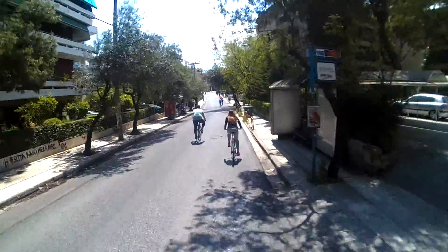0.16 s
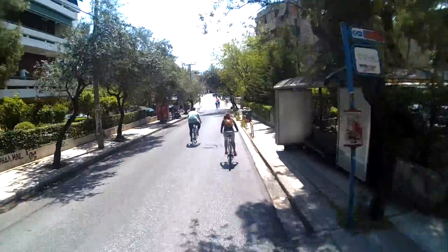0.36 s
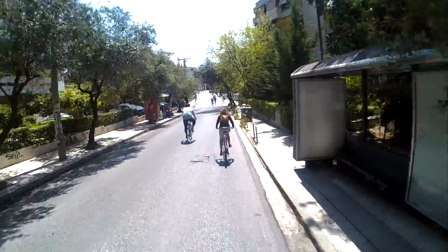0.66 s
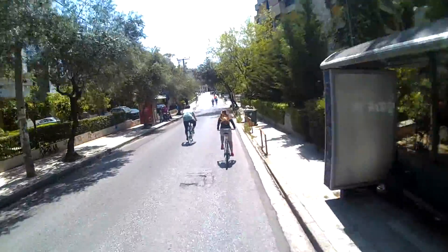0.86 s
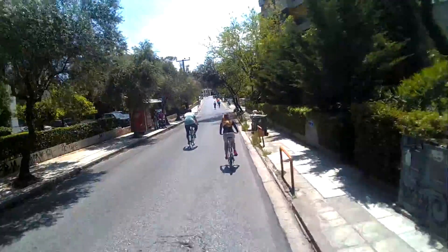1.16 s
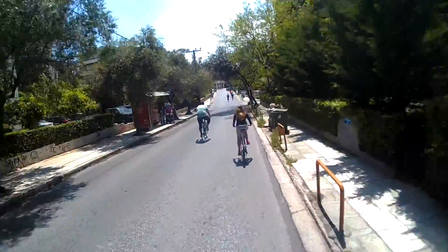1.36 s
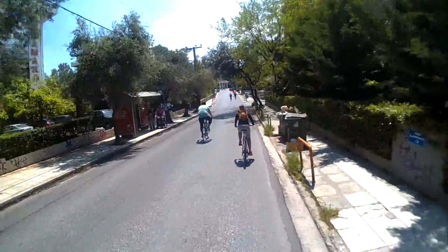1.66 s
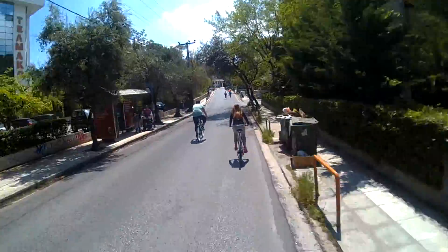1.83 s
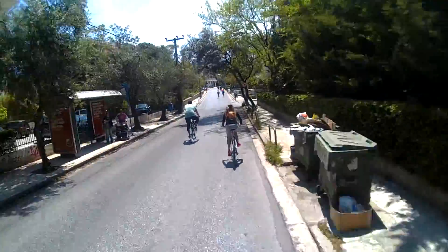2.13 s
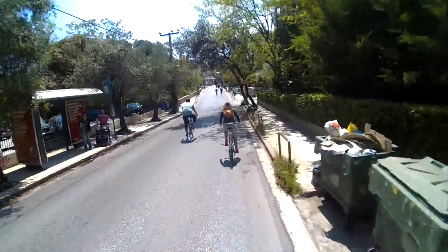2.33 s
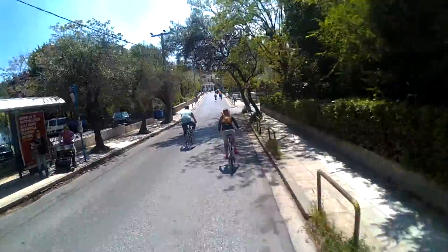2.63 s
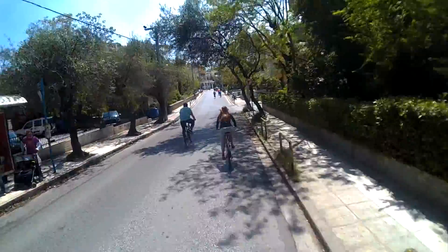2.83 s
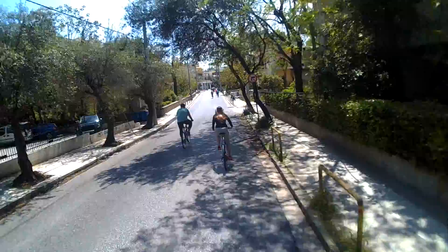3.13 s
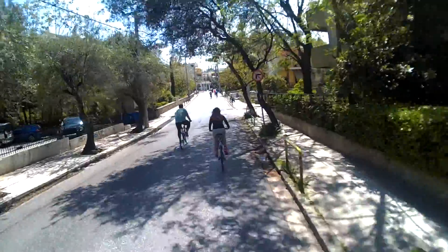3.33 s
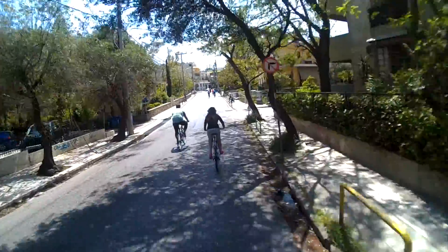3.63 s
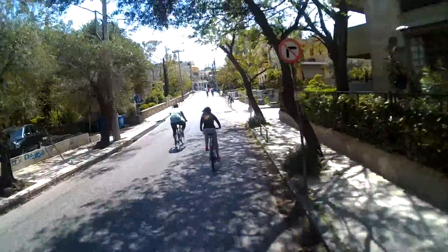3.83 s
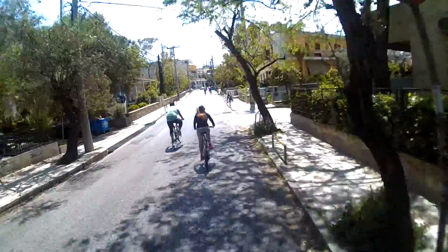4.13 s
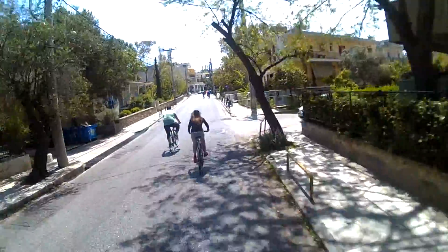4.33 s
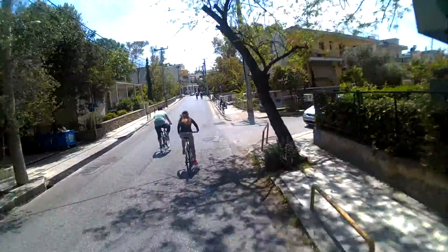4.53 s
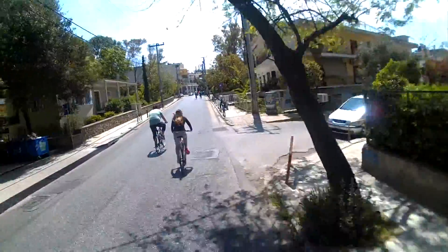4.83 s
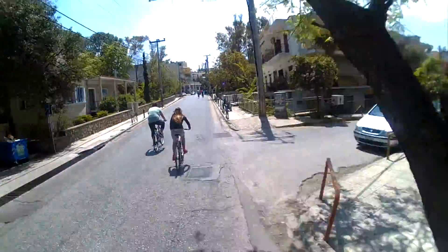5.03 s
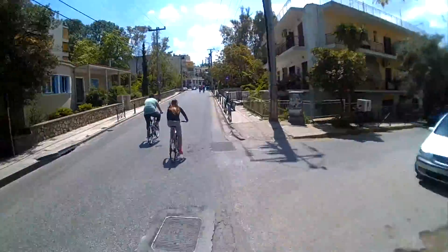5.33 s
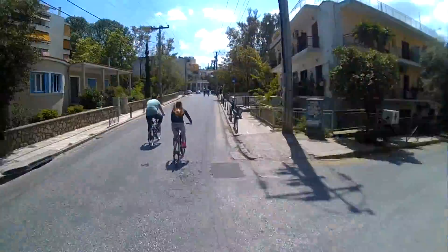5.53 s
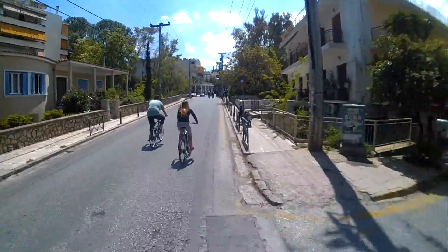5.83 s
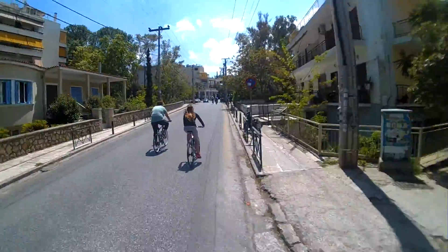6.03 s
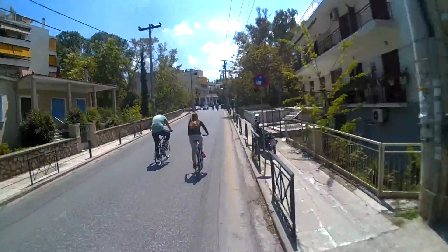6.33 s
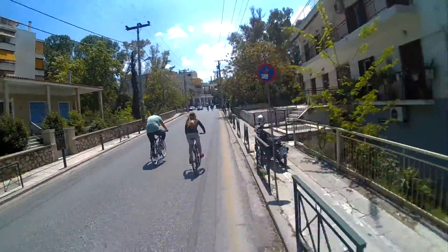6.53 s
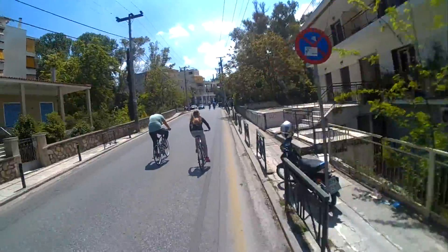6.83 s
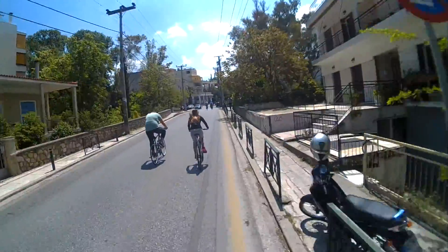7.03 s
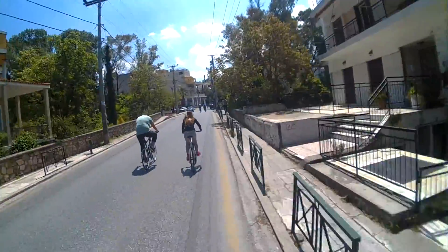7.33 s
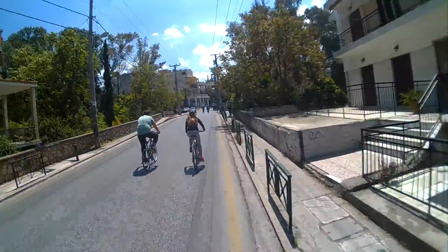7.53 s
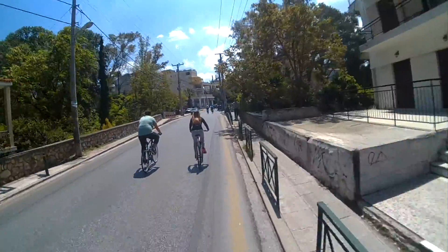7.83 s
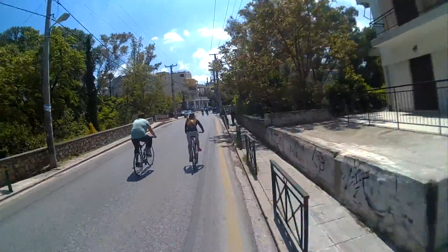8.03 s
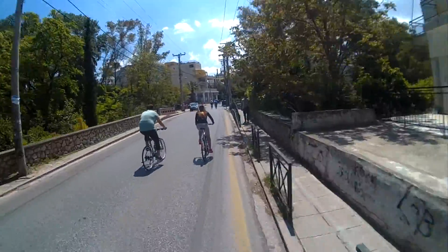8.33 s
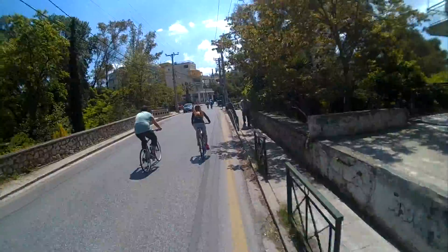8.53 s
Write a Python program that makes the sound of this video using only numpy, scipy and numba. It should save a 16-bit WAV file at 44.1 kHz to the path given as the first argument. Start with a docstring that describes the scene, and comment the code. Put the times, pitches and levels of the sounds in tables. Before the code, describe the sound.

Heard from a moving bicycle, a hollow, fluttering rush of wind covers nearly everything, muffled by the case around the microphone. Gusts bump against it, briefly whistle and now and then drop out for an instant. Faint tyre noise on the asphalt and light chain ticking lie underneath. Scattered small knocks build into a run of rattles on a rough stretch of street, and the wind grows softer toward the end.

```python
"""An asphalt street, heard from a small cased camera riding on a bicycle. The turbulent airstream
buffets the case, rings its cavity near 1.35 kHz and hisses over its edges; single gusts thump or whistle
briefly, and now and then the flow lifts off in a short lull. Beneath the wind the tyres sizzle and the
chain ticks, and on rough patches a loose part chatters. The case shuts out nearly all the treble."""
import sys
import numpy as np
from scipy import signal
from scipy.fft import rfft, irfft, next_fast_len
from scipy.io import wavfile
from scipy.ndimage import uniform_filter1d
from numba import njit

SR = 44100
rng = np.random.default_rng(int(sys.argv[2]) if len(sys.argv) > 2 else 0)


def to_wav(sig):
    """Store sig (one row per channel, or 1-D mono) as 16-bit WAV at the path in sys.argv[1].

    Samples outside -1..1 are clipped; the rate is SR.
    """
    pcm = np.clip(np.atleast_2d(sig), -1, 1) * 32767
    pcm = np.round(pcm).astype(np.int16)
    wavfile.write(sys.argv[1], SR, pcm.T)  # frames by channels


N = 382347
T = np.arange(N) / SR

# dull clack of one contact, in the chain or the loose part: (frequency [Hz], level [dB])
CLACK_SPECTRUM = [(300, -25.5), (1300, -10.5), (2300, -11.5), (2750, -1), (3200, 3.5), (3700, -9),
                  (4500, -15), (4800, -27.5), (5300, -29.5), (5950, -54), (6500, -39), (7400, -45),
                  (8000, -60)]

def undb(db):
    """Decibels to amplitude ratio."""
    return 10 ** (np.asarray(db) / 20)

def unit(x):
    """Normalisation to rms 1."""
    return x / np.sqrt(np.mean(x ** 2))

def curve(table):
    """Linear interpolation of (time [s], value) rows."""
    return np.interp(T, *np.transpose(table))

def log_gain(spectrum, size):
    """Log gain of (frequency [Hz], level [dB]) rows on FFT bins, rolling off above the last row."""
    hz, db = np.transpose(spectrum)
    bins = np.maximum(np.arange(size // 2 + 1) * SR / size, 1)
    rolloff = 10 * np.log(np.maximum(bins / hz[-1], 1))
    return np.log(undb(np.interp(np.log(bins), np.log(hz), db))) - rolloff

def noise(spectrum):
    """White noise filtered to a (frequency [Hz], level [dB]) spectrum, rms 1."""
    size = next_fast_len(N, True)
    white = rfft(rng.standard_normal(size))
    return unit(irfft(white * np.exp(log_gain(spectrum, size)), size)[:N])

def impulse(spectrum, size=512):
    """Minimum-phase impulse response of a spectrum, peak 1."""
    cepstrum = irfft(log_gain(spectrum, size))
    cepstrum[1:size // 2] *= 2
    cepstrum[size // 2 + 1:] = 0
    click = irfft(np.exp(rfft(cepstrum)))
    return click / np.abs(click).max()

@njit
def bandpass(x, hz, width_hz):
    """Second-order resonator whose centre frequency may move."""
    y, band_state, low_state = np.empty(len(x)), 0., 0.
    for i in range(len(x)):
        g, damping = np.tan(np.pi * hz[i] / SR), width_hz / hz[i]
        band = (band_state + g * (x[i] - low_state)) / (1 + g * (g + damping))
        band_state, low_state = 2 * band - band_state, low_state + 2 * g * band
        y[i] = damping * band
    return y

def wander(per_s):
    """Smooth random fluctuation of rms 1, with about per_s new values a second."""
    hold = max(int(SR / per_s), 1)
    steps = np.repeat(rng.standard_normal(N // hold + 2), hold)[rng.integers(hold):][:N]
    return unit(uniform_filter1d(steps, hold))

def flutter(per_s, depth_db):
    """Random amplitude modulation, as by passing eddies; mean power 1."""
    return unit(undb(depth_db * wander(per_s)))

def swell(at, length):
    """Gaussian envelope, length seconds wide at half power."""
    return 2 ** (-2 * ((T - at) / length) ** 2)

def tyres():
    """Rolling noise: the tread sizzles faintly on the asphalt, most on the coarse stretch."""
    # tread sizzle: (frequency [Hz], level [dB])
    spectrum = [(2500, -8.5), (4000, 2.5), (4700, 3), (5400, -15), (5950, -39), (6500, -19.5), (7200, -19),
                (8000, -44), (9000, -32.5), (10400, -26.5), (12500, -32.5), (15000, -40)]
    # its strength along the road: (time [s], level [dB])
    road_level = [(.55, -75), (.75, -61), (2, -62), (3.5, -53.5), (4.8, -52), (5.2, -62.5), (7.1, -73),
                  (8.67, -73)]
    return noise(spectrum) * undb(curve(road_level)) * flutter(per_s=40, depth_db=-0.1)

def chain(ticks_per_s=160, spread_db=3, contact_s=0.001):
    """Impact noise: links strike the sprockets at random times, each with its own force."""
    # chain noise, loudest under pedalling: (time [s], level [dB])
    chain_level = [(.55, -67), (.68, -28), (.95, -45.5), (1.6, -35.5), (1.95, -43), (2.6, -40.5),
                   (4.9, -38), (5.9, -50), (6.6, -57)]
    ticks = (rng.random(N) < ticks_per_s / SR) * undb(spread_db * rng.standard_normal(N))
    force = signal.lfilter([1], [1, -np.exp(-1 / (contact_s * SR))], ticks)
    grit = force * rng.standard_normal(N)
    return unit(signal.fftconvolve(grit, impulse(CLACK_SPECTRUM))[:N]) * undb(curve(chain_level))

def rattles(bounce_s=0.0031, fade_db=6.0, scrape_s=0.001, ring_db=-9.5, uneven_db=3.3):
    """Impact excitation: a loose part rebounds unevenly; its contacts clack, tick and ring its modes."""
    # knocks: (time [s], relative level [dB], chatter length [s], tick level re the knock [dB])
    knocks = [(.131, -34, 0.0039, -44), (0.149, -32, .0034, -35), (.678, -36, 0.005, -28),
              (.723, -35, 0.029, -43), (.861, -34, .015, -48), (1.134, -28, 0.0034, -37.5),
              (1.303, -30.5, .014, -42), (1.397, -32, .006, -41), (1.46, -24.5, 0.008, -33),
              (1.482, -24.5, .0087, -37), (2.387, -26.5, 0.0034, -35), (2.445, -28.5, .006, -40),
              (3.873, -26.5, 0.0048, -35), (5.13, -25.5, .005, -35), (5.238, -27, 0.0077, -43),
              (5.417, -25, 0.01, -33), (5.459, -20.5, 0.012, -32.5), (5.494, -27.5, 0.0075, -43),
              (5.55, -28.5, 0.012, -38), (5.588, -29, 0.012, -42), (5.634, -23.5, 0.0041, -43),
              (5.719, -27.5, .017, -33), (5.775, -19.5, 0.011, -30), (5.854, -27, 0.018, -35),
              (5.896, -24.5, 0.009, -38), (5.939, -28.5, 0.0074, -37), (6.094, -27.5, .013, -27),
              (6.115, -20, 0.014, -31), (6.179, -28.5, 0.0045, -28), (6.193, -28, .01, -38),
              (6.272, -21.5, 0.014, -38), (6.377, -28.5, .0043, -37), (7.151, -27.5, .0026, -33),
              (7.167, -30.5, 0.028, -37), (7.221, -23, 0.016, -39), (7.285, -38.5, .005, -29),
              (7.657, -31, .009, -39), (7.681, -27, 0.017, -35), (7.764, -34.5, .012, -39),
              (8.122, -36, 0.0024, -34), (8.197, -42, .003, -30.5), (8.392, -33, .004, -45)]
    # modes of the part: (frequency [Hz], level [dB], time to decay 60 dB [s])
    part_modes = [(1900, -8, 0.055), (2870, 3.5, 0.056), (2940, 4.5, 0.06), (3330, 0, 0.024),
                  (3640, 0, 0.051), (3970, -3.5, 0.035), (4400, -4, 0.035)]
    # bright tick of one contact: (frequency [Hz], level [dB])
    tick_spectrum = [(7000, -42), (8300, -6), (9500, 4.5), (11500, 4.5), (14000, -3.5), (15500, -19.5)]
    out, t = np.zeros(N + SR), T[:SR // 10]
    clack, tick = impulse(CLACK_SPECTRUM), impulse(tick_spectrum)
    hz, mode_db, t60 = np.transpose(part_modes)[:, :, None]
    for at, db, length, tick_db in knocks:
        delays = np.cumsum(np.append(0, bounce_s * (.4 + 1.3 * rng.random(size=12))))
        sizes = undb(-fade_db * delays / length + uneven_db * rng.standard_normal(len(delays)))
        force = sum(size * (t >= delay) * np.exp(-np.abs(t - delay) / scrape_s)
                    for delay, size in zip(delays, sizes) if delay < length)
        grit = force * (1 - np.exp(-t / 0.0005)) * rng.standard_normal(len(t))  # first touch eases in
        detune = 1 + 0.033 * rng.standard_normal(hz.shape)
        strike_db = mode_db + 4 * rng.standard_normal(hz.shape)  # each knock lands on another spot
        decay = np.exp(-np.log(1000) * t / t60)
        ring = np.sum(undb(strike_db) * decay * np.sin(2 * np.pi * hz * detune * t), axis=0)
        dull, bright = (unit(signal.fftconvolve(grit, body)[:len(t)]) for body in (clack, tick))
        ringing = unit(signal.fftconvolve(dull, ring)[:len(t)])
        knock = unit(dull + undb(ring_db) * ringing) + undb(tick_db) * bright
        duty = (length + 0.0059) / t[-1]  # the level counts over the chatter and its short ring
        start = int(at * SR)
        out[start:start + len(t)] += undb(db) * np.sqrt(duty) * knock
    return out[:N]

def lull_db():
    """Flow separation: the drop in level while the airstream lifts off the case."""
    # lulls: (time [s], depth [dB], length [s])
    lulls = [(1.28, 13, 0.04), (4.577, 1.5, 0.11), (5.945, 2.5, 0.049), (7.618, 8.5, 0.038),
             (7.72, 1, 0.022), (7.926, 1.5, 0.036), (8.408, 8, 0.017), (8.57, 2.5, 0.064)]
    return sum(depth * swell(at, length) for at, depth, length in lulls)

def cavity(drive, ring_db, hz=1360, width_hz=260.):
    """Cavity resonance: the air in the case rings with the flow, wavering in pitch."""
    pitch = hz * (1 + 0.053 * wander(9))
    return unit(drive + undb(ring_db) * bandpass(drive, pitch, width_hz))

def sliding_tones(width_hz=90.):
    """Narrow-band noise: faint, breathy tones glide in pitch within the wind."""
    # breathy tones: (time [s], pitch [Hz], slide [Hz/s], level [dB], length [s])
    tones = [(1.382, 1920, 2997, -28, .05), (5.172, 1754, -300, -32, 0.35), (5.45, 2186, -450, -32.5, .4),
             (5.63, 1594, -900, -28.5, .12), (7.028, 1450, 1, -27, .06)]
    breath = noise([(500, -15), (1200, 0.5), (2400, 0), (5000, -40.5)])
    out = np.zeros(N)
    for at, hz, slide, db, length in tones:
        pitch = hz + slide * np.clip(T - at, -2 * length, 2 * length)
        out += unit(bandpass(breath, pitch, width_hz)) * undb(db) * swell(at, length)
    return out

def thumps(width_hz=130.):
    """Vortex shedding: slow eddies leave the case with soft, hollow bumps."""
    # bumps: (time [s], pitch [Hz], relative level [dB], length [s])
    bumps = [(0.59, 207, -26.5, 0.035), (0.7, 210, -26, 0.022), (0.756, 219, -26, 0.037),
             (1.3, 246, -23, 0.021), (1.953, 218, -29, .03), (4.45, 330, -28.5, 0.026),
             (4.683, 320, -33, .04), (6.493, 330, -29.5, .03), (6.926, 282, -30.5, 0.017),
             (8.014, 168, -32.5, 0.036), (8.158, 268, -30, 0.013), (8.622, 280, -33, .023)]
    stir = noise([(40, 5.5), (400, -1), (1200, -30)])
    return sum(unit(bandpass(stir, np.full(N, float(hz)), width_hz)) * undb(db) * swell(at, length)
               for at, hz, db, length in bumps)

def whistles(rise_per_s=0.509, waver=0.016):
    """Lock-in: air across an opening briefly sounds the cavity, rising a little in pitch."""
    # cavity tones: (time [s], pitch [Hz], relative level [dB], length [s])
    tones = [(0.514, 1325, -22.5, 0.052), (1.006, 1280, -13.5, .009), (1.534, 1340, -20.5, 0.034),
             (2.888, 1334, -19, .03), (5.991, 1410, -14.5, .008), (7.182, 1328, -19.5, 0.042),
             (7.251, 1394, -22.5, .032), (7.671, 1337, -18, 0.019), (8.2, 1270, -25, .026),
             (8.234, 1258, -19.5, 0.023), (8.658, 1157, -28.5, .03)]
    out, wobble = np.zeros(N), waver * wander(180)
    for at, hz, db, length in tones:
        near = np.abs(T - at) < 3 * length
        pitch = hz * (1 + rise_per_s * (T[near] - at) + wobble[near])
        tone = np.sqrt(2) * np.sin(2 * np.pi * np.cumsum(pitch) / SR)
        out[near] += undb(db) * swell(at, length)[near] * tone
    return out * (1 + .5 * np.tanh(wander(220)))  # the jet flutters, so the tone is breathy

def gusts():
    """Pressure pulses: each large eddy hits the case with a short, broadband thump."""
    # eddy strikes: (time [s], relative level [dB], length [s])
    strikes = [(0.998, -16.5, 0.0075), (1.024, -20, 0.012), (1.084, -23.5, .018), (1.228, -21, 0.019),
               (2.014, -20.5, 0.034), (2.374, -20, .034), (2.436, -18.5, 0.013), (2.675, -26.5, 0.088),
               (2.907, -21.5, .042), (3.478, -17.5, 0.021), (3.861, -14.5, 0.022), (4.383, -23, 0.092),
               (4.683, -28, 0.054), (6.08, -23.5, 0.033), (6.337, -28, 0.031), (6.938, -22, 0.033),
               (7.167, -22, 0.0098), (8.197, -28, 0.031), (8.35, -27.5, .03), (8.474, -25, 0.013),
               (8.635, -26, 0.013)]
    pressure = noise([(25, -6), (90, -1), (300, -2), (700, 1.5), (1300, 4), (2200, -3), (3200, -5),
                      (4400, -25.5), (5500, -48.5)])
    return cavity(pressure, ring_db=-7) * sum(undb(db) * swell(at, length) for at, db, length in strikes)

def buffeting():
    """Turbulent pressure fluctuations beat unevenly on the case."""
    # pressure on the wall: (frequency [Hz], level [dB])
    spectrum = [(20, -11.5), (45, -7.5), (90, -1.5), (160, -1.5), (290, 0), (450, -1.5), (700, -4),
                (1100, -5.5), (2000, -19.5), (4000, -67.5)]
    return noise(spectrum) * flutter(per_s=55, depth_db=2) * flutter(per_s=22, depth_db=1)

def cavity_rush():
    """Forced resonance: broadband flow noise drives the cavity to a hollow rush."""
    # driving noise: (frequency [Hz], level [dB])
    spectrum = [(200, -28.5), (600, -8.5), (850, -4), (1100, -1), (1400, 0), (1650, -3.5), (2300, -26.5),
                (4500, -69.5)]
    return cavity(noise(spectrum), ring_db=7.5) * flutter(per_s=70, depth_db=0.9)

def edge_noise(flow_db, width_hz=1050.):
    """Flow noise: air over the edges gives a broad rush and a hiss that grow with its strength."""
    # centre of the rush, shifting with the angle of the air: (time [s], frequency [Hz])
    edge_pitch = [(0, 1870), (1.45, 2024), (5.2, 2015), (6.0, 1760), (6.5, 1956)]
    # hiss: (frequency [Hz], level [dB])
    hiss_spectrum = [(1700, -16.5), (2450, -3), (2900, 2), (3250, 0), (3700, -9), (4200, -17.5),
                     (4600, -26.5), (5400, -48), (6000, -62), (7000, -69), (10300, -55), (15000, -66)]
    hz = curve(edge_pitch)
    breath = noise([(500, -13), (1500, 3.5), (2300, 0), (3500, -15), (5000, -37)])
    rush = unit(bandpass(bandpass(breath, hz, width_hz), hz, width_hz))
    return rush * undb(-26 + flow_db) + noise(hiss_spectrum) * undb(-31 + 0.88 * flow_db)

def wind(lull_share=0.33):
    """Common modulation: one airstream and its eddies drive buffeting, rumble, rush and edge noise."""
    # strength of the airstream, near 0 at full speed: (time [s], level [dB])
    flow = [(0, -5), (.3, -3), (.52, -7.5), (.93, -5.5), (1.46, -0.4), (1.85, 1), (1.98, -4), (2.25, 0.1),
            (4.1, 1.5), (4.93, -5), (4.99, -1.1), (5.65, -3.5), (6.27, -4.5), (6.74, -13), (7.0, -6.5),
            (7.55, -10), (8.3, -8), (8.67, -11.5)]
    # how much the air tumbles: (time [s], level [dB])
    turbulence = [(0, 5.5), (.22, -0.5), (.62, 3.5), (.92, 3), (1.29, 3), (1.37, -3), (2.0, 3), (2.42, 4),
                  (2.6, -1.5), (4.24, 1), (4.44, 5), (4.8, 3.5), (5.15, -.5), (5.8, -0.5), (6.55, 0),
                  (7.3, 0.5), (7.9, -3), (8.55, -0.5)]
    flow_db, turbulence_db, drop_db = curve(flow), curve(turbulence), lull_db()
    tumble = undb(-.3 * (flow_db + 2))  # fast, attached flow runs evenly; slack flow tumbles
    buffet = buffeting() * undb(-36.5 + turbulence_db - lull_share * drop_db)
    rumble = noise([(20, -0.5), (60, -1), (160, -18)]) * undb(-49.5 + flow_db)
    rush = cavity_rush() * undb(-24.5 + 0.84 * flow_db + 0.16 * turbulence_db - lull_share * drop_db)
    edges = edge_noise(flow_db) * undb(-drop_db) * flutter(per_s=110, depth_db=1.4 * tumble)
    return (rumble + buffet + rush + edges) * flutter(per_s=30, depth_db=0.82 * tumble)

def scene():
    """Superposition of wind, tyres, chain and the loose part in one channel."""
    air = wind() + undb(-0.5) * gusts() + undb(-3) * thumps() + undb(-4.5) * whistles() + sliding_tones()
    rolling = (tyres() + chain()) * undb(-lull_db())  # the fine treble dips with each lull
    return (air + rolling + undb(2.5) * rattles())[None]

def record(dry):
    """Self-noise and band limiting: the camera adds a faint hiss and cuts the top."""
    cutoff_hz = 15800
    self_noise = undb(-88) * noise([(1000, -2), (5000, 0), (8000, -4.5), (11000, 5), (16000, -3.5)])
    return signal.sosfilt(signal.ellip(8, .2, 70, cutoff_hz, fs=SR, output="sos"), dry + self_noise)

dry = scene()
out = record(dry)
to_wav(out)
```